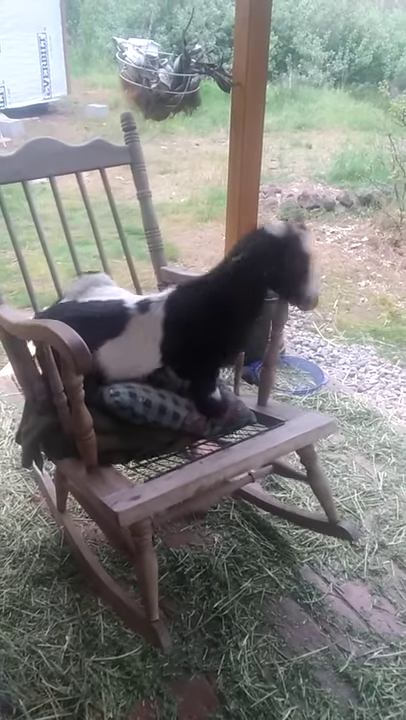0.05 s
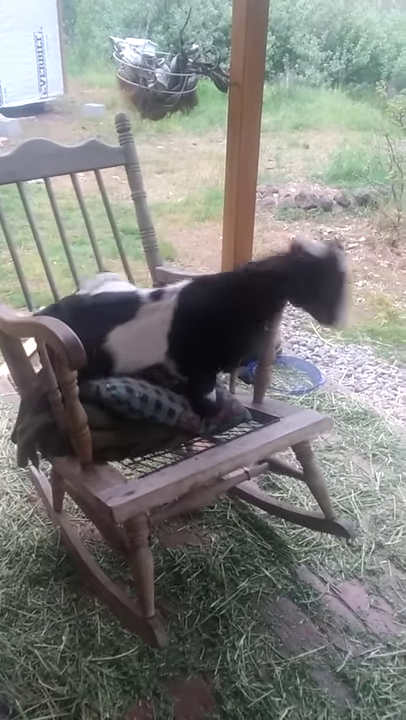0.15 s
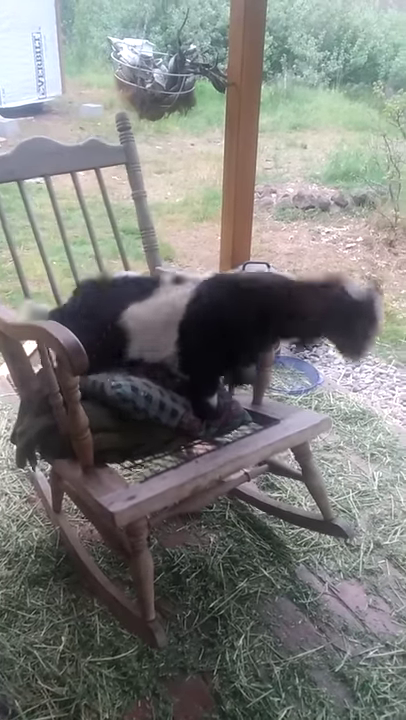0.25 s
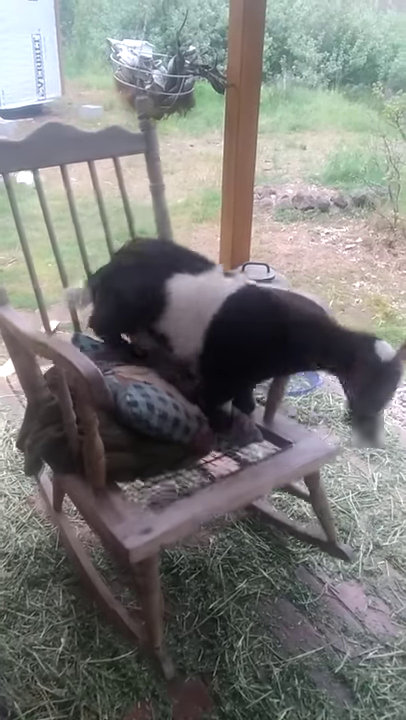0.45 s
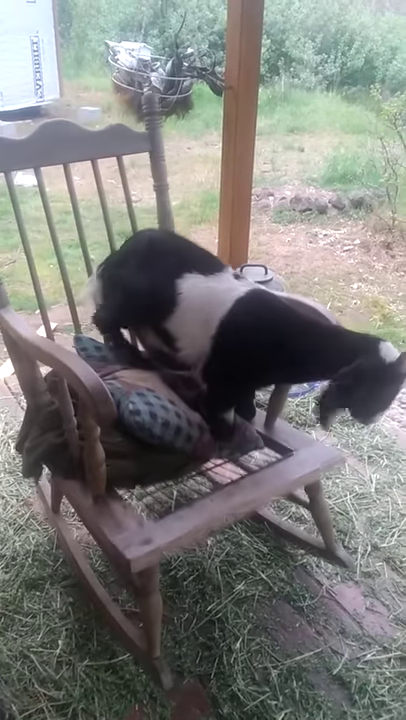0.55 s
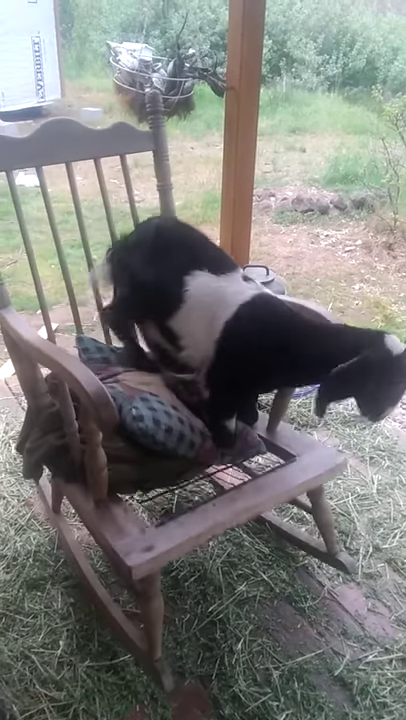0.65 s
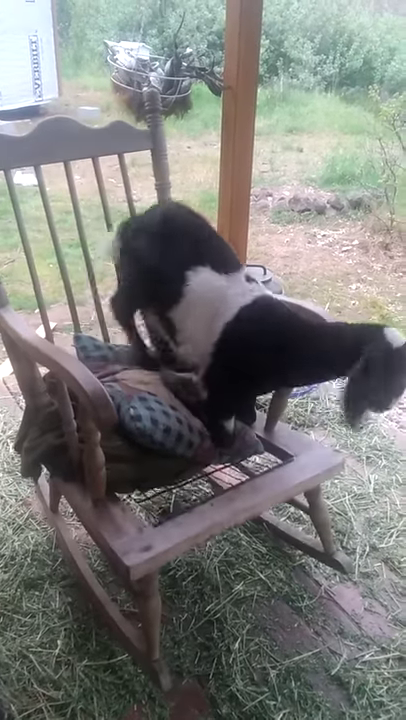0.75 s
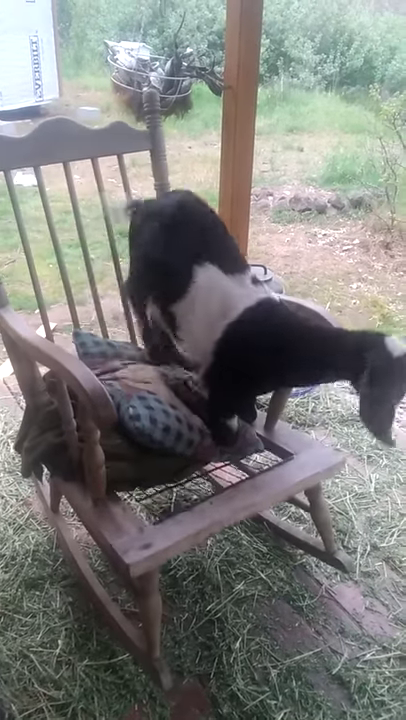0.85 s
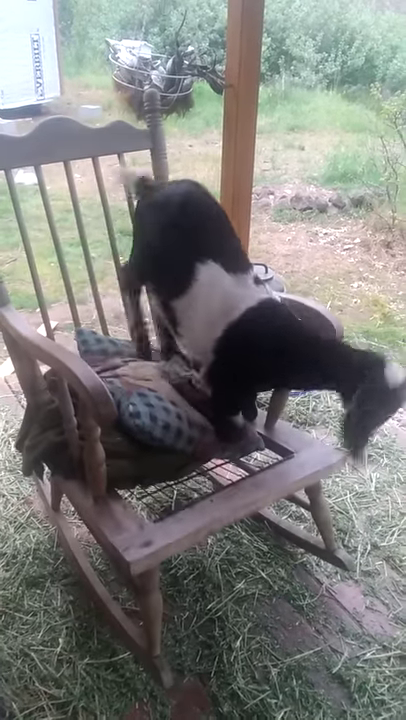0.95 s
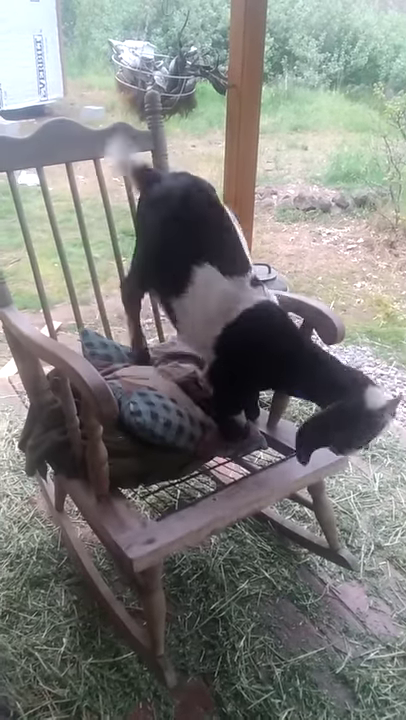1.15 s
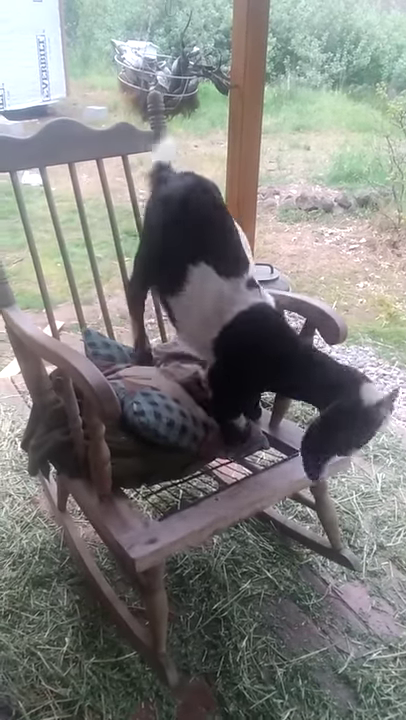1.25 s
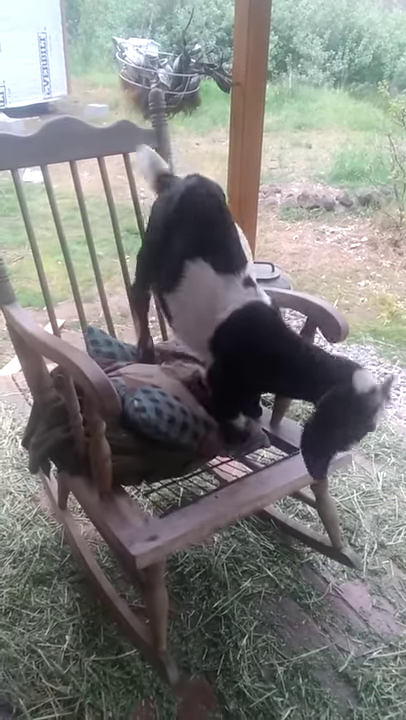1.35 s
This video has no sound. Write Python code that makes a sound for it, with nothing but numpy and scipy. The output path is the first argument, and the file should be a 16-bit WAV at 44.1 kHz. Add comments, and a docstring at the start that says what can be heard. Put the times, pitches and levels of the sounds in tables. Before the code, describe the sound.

A wooden rocking chair knocks and thuds under a young goat's hooves, its rockers rumbling low. Lighter taps follow, then a short dry creak. Crickets chirp faintly throughout, beyond the porch where the chair is heard close by.

```python
"""Crickets chirp in the grass outside a porch, first and throughout, each wing stroke a falling pip.
A young goat gets up and shifts on a wooden rocking chair: the rockers rumble over the floor,
hooves knock on the frame and thud on the seat, and a dry joint sticks and slips in a creak
as the weight moves forward."""
import sys
import numpy as np
from scipy import signal
from scipy.fft import rfft, irfft
from scipy.io import wavfile
from scipy.ndimage import uniform_filter1d

SR = 44100
rng = np.random.default_rng(int(sys.argv[2]) if len(sys.argv) > 2 else 0)


def bounce(signal):
    """Save signal as a 16-bit WAV file at the path given by the first command-line argument."""
    frames = np.transpose(np.atleast_2d(signal))
    limited = np.clip(frames, -1, 1)
    pcm = np.round(limited * 32767).astype(np.int16)
    wavfile.write(sys.argv[1], SR, pcm)


N = 61739
T = np.arange(N) / SR


def from_db(db):
    """Decibels to gain."""
    return 10 ** (np.asarray(db) / 20)


def unit_rms(x):
    """Scale to unit rms."""
    return x / np.sqrt(np.mean(x ** 2) + 1e-20)


def unit_energy(x):
    """Scale to unit energy."""
    return x / np.sqrt(np.sum(x ** 2) + 1e-20)


def envelope(rows):
    """Gain over time from rows of time_s, level_db."""
    return from_db(np.interp(T, *np.transpose(rows)))


def add(out, start_s, x):
    """Mix x into out from start_s."""
    i = int(np.clip(start_s * SR, 0, N - 1))
    out[i:i + len(x)] += x[:N - i]


def butter(x, hz, kind, order=2):
    """Butterworth filter."""
    sos = signal.butter(order, np.clip(hz, 10, .45 * SR), kind, fs=SR, output="sos")
    return signal.sosfilt(sos, x + 1e-18)


def pole_pair(hz, width_hz):
    """Coefficients of one resonance."""
    r = np.exp(-np.pi * width_hz / SR)
    return np.array([1, -2 * r * np.cos(2 * np.pi * hz / SR), r * r])


def resonate(x, hz, width_hz):
    """One resonance, unit peak gain."""
    poles = pole_pair(hz, width_hz)
    return signal.lfilter((1 - poles[2]) / 2 * np.array([1, 0, -1]), poles, x + 1e-18)


def noise(spectrum):
    """Noise from rows of freq_hz, density_db."""
    hz, db = np.transpose(spectrum)
    bins_hz = np.arange(N + 1) * SR / (2 * N)
    gain = from_db(np.interp(np.log(bins_hz + 1), np.log(hz), db))
    return irfft(rfft(rng.standard_normal(2 * N)) * gain)[:N] * np.sqrt(SR / 2)


def scatter(x, t60_s, build_s):
    """Dense reflections that build up and die away."""
    t = T[:SR]
    tail = rng.standard_normal(SR) * from_db(-60 * t / t60_s) * (1 - np.exp(-t / build_s))
    return signal.fftconvolve(x, unit_energy(tail))[:N]


STROKE_S = 0.015
GARDEN_T60_S, GARDEN_BUILD_S = 0.18, 0.0296


def wing_stroke(pitch_hz, sag_hz_per_s):
    """A pure pip that swells, fades and falls in pitch."""
    t = np.arange(-STROKE_S / 2, STROKE_S / 2, 1 / SR)
    cycles = pitch_hz * t - sag_hz_per_s * t * t / 2
    return np.cos(np.pi * t / STROKE_S) ** 2 * np.sin(2 * np.pi * cycles)


# first_stroke_s, strokes, level_db, pitch_hz, swell_db_per_stroke
CHIRPS = [(0.017, 3, -46, 5248, 2), (0.004, 3, -50.5, 5285, -0.5), (0.320, 3, -46, 5260, 0),
          (0.369, 1, -43, 5280, 0), (0.425, 3, -55, 4770, -1.5), (0.442, 2, -51, 5290, -7),
          (0.537, 1, -49, 5190, 11), (0.571, 3, -43.5, 5244, 0.4), (0.730, 3, -54.5, 4890, 1),
          (0.750, 3, -58, 4710, 1.5), (0.779, 1, -51, 5100, 0), (0.834, 3, -47, 5284, 0.5),
          (0.989, 2, -54.5, 5186, 1), (1.032, 2, -59.5, 4740, 3), (1.116, 3, -49.5, 5128, 1),
          (1.298, 3, -53.5, 5210, 5), (1.347, 2, -54, 4840, -8), (1.368, 1, -45, 5224, -11)]


def near_crickets(spacing_s=.039):
    """Chirps of one to three evenly spaced wing strokes."""
    out = np.zeros(N)
    for first_s, strokes, level_db, pitch_hz, swell_db in CHIRPS:
        pip = wing_stroke(pitch_hz, sag_hz_per_s=25000)
        for k in range(round(strokes)):
            add(out, first_s + k * spacing_s - STROKE_S / 2, from_db(level_db + k * swell_db) * pip)
    return out


# time_s, relative_db
CHORUS_ENVELOPE = [(0, -49), (0.09, -50.5), (0.14, -60), (0.21, -66.5), (0.29, -53), (0.4, -58.5),
                   (0.52, -57.5), (0.56, -61.5), (0.63, -52.5), (0.72, -63.5), (0.84, -55), (0.92, -56.5),
                   (0.97, -67), (1.09, -68.5), (1.125, -55.5), (1.2, -53.5), (1.26, -66.5), (1.4, -55.5)]
# start_s, length_s, relative_db, pitch_hz
TRILLS = [(0.19, .11, -60, 5840), (0.46, .13, -68.5, 5780), (0.83, .11, -72, 5840),
          (1.11, .11, -65.5, 5850), (0.151, .03, -66, 4560), (1.08, .13, -72, 4560)]


def far_crickets(chorus_hz=5302, spread_hz=96, sag_hz_per_s=24000):
    """Overlapping strokes blur into a shimmer; faint trills stand above and below it in pitch."""
    chorus_strokes_per_s, trill_strokes_per_s = 320, 45
    chorus, trills = np.zeros(N), np.zeros(N)
    for k, (late, detune) in enumerate(rng.standard_normal((SR // 50, 2))):
        start_s = (k + late / 2) / chorus_strokes_per_s
        if start_s < T[-1]:
            add(chorus, start_s, wing_stroke(chorus_hz + spread_hz * detune, sag_hz_per_s))
    for start_s, length_s, relative_db, pitch_hz in TRILLS:
        pip = from_db(relative_db) * wing_stroke(pitch_hz, sag_hz_per_s)
        for centre_s in np.arange(start_s, start_s + length_s, 1 / trill_strokes_per_s):
            add(trills, centre_s - STROKE_S / 2, pip)
    shimmer = from_db(-4.5) * envelope(CHORUS_ENVELOPE) * unit_rms(chorus)
    reflections = scatter(trills, GARDEN_T60_S, GARDEN_BUILD_S)
    return shimmer + from_db(0.5) * trills + from_db(-3) * reflections


# freq_hz, density_db
AIR_SPECTRUM = [(30, -112), (60, -102), (150, -105), (400, -108), (1000, -113), (3000, -121), (8000, -124),
                (15000, -124)]


def air():
    """Faint, steady hiss of air."""
    return noise(AIR_SPECTRUM)


# time_s, relative_db
RUMBLE_ENVELOPE = [(0, -90), (0.125, -92), (0.16, -61), (0.2, -53.5), (0.235, -48.5), (0.27, -39.5),
                   (0.34, -44.5), (0.385, -35), (0.45, -45.5), (0.52, -52), (0.62, -50), (0.74, -58.5),
                   (0.87, -60), (1.0, -62.5), (1.2, -64), (1.235, -57), (1.32, -41), (1.4, -55)]
# freq_hz, relative_db
RUMBLE_SPECTRUM = [(25, -31), (40, -10), (60, 4), (85, -3.5), (115, -6), (155, -5.5), (200, -20),
                   (300, -35), (600, -52.5), (2500, -100)]


def rockers():
    """Runners roll over the rough floor: an even rumble that swells and ebbs."""
    rumble = noise(RUMBLE_SPECTRUM)
    running_rms = np.sqrt(uniform_filter1d(rumble ** 2, size=2200) + 1e-20)
    return from_db(-2.5) * envelope(RUMBLE_ENVELOPE) * rumble / running_rms


# start_s, relative_db, low_hz, high_hz, grind_s
KNOCKS = [(0.149, -67, 2180, 4580, 0.0089), (0.179, -43.5, 1144, 3090, 0.042),
          (0.184, -42.5, 1304, 1393, 0.0034), (0.188, -61, 648, 724, 0.0085),
          (0.2438, -29, 150, 1000, 0.0029), (0.2495, -24, 310, 1160, 0.00036),
          (0.2508, -23.5, 1040, 2750, 0.0056), (0.258, -56, 255.6, 2210, 0.0077),
          (0.266, -22.5, 1490, 4470, 0.0034), (0.268, -20, 500, 2200, 0.0026),
          (0.272, -21.5, 2576, 3104, 0.002), (0.296, -31, 190, 1047, 0.01),
          (0.3641, -38, 1720, 3600, 0.011), (0.375, -33, 970, 1574, 0.0041), (0.378, -37, 574, 727, 0.0018),
          (0.383, -35, 200, 960, 0.0084), (0.396, -41, 1656, 2860, 0.0088), (0.453, -37, 1140, 2970, 0.01),
          (0.455, -44, 176.8, 930, 0.0047), (0.547, -55, 1300, 3100, 0.0021),
          (0.583, -60, 2440, 2640, 0.011), (0.620, -64, 2470, 2730, 0.0042),
          (0.646, -49, 1734, 2760, 0.0091), (0.649, -50, 3340, 4320, 0.006),
          (0.651, -46.5, 2305, 2745, 0.005), (0.794, -64.5, 301, 369, .003),
          (0.929, -69, 2710, 2940, 0.0025), (1.027, -51, 489, 590, 0.0029), (1.038, -62, 260, 330, .004),
          (1.046, -77, 3150, 3350, .004), (1.089, -64.5, 1456, 1753, .012),
          (1.183, -65.5, 1300, 1450, 0.0019), (1.270, -41.5, 233, 560, 0.0047),
          (1.275, -37, 543, 619, 0.0027), (1.297, -40, 260, 583, 0.018), (1.327, -47, 232, 560, 0.019),
          (1.364, -48.5, 260, 348, 0.0049)]
# freq_hz, width_hz, lift_db
FRAME_PEAKS_AND_DIPS = [(310, 84, 4.5), (424, 26, 0), (693, 43, 7), (760, 33.6, 3), (846, 53, 6),
                        (1027, 70, -9), (1128, 52, 2), (1201, 57, 6), (1303, 17, 2), (1564, 55, 7.5),
                        (1738, 12, 2.5), (1835, 45, 7), (2090, 42, 4), (2120, 40, 3), (2445, 35, 7),
                        (2686, 47, 2), (2890, 93, 4.5), (3300, 390, -4), (3605, 95, 4), (3600, 33, 4),
                        (4150, 220, -5), (4480, 40, 5)]


def hoof_knocks(grains_per_s=4000, grind_db=5, top_hz=4650):
    """Each contact is a click and a brief grind, coloured by where it lands and rung by the frame."""
    out, t = np.zeros(N), T[:SR // 8]
    for start_s, relative_db, low_hz, high_hz, grind_s in KNOCKS:
        swell = np.sqrt(t / grind_s) * np.exp(-t / grind_s)
        grains = rng.standard_normal(len(t)) * (rng.random(len(t)) < grains_per_s / SR)
        force = signal.unit_impulse(len(t)) + from_db(grind_db) * grains * swell
        knock = butter(force, [low_hz, high_hz], "band", order=3)
        add(out, start_s, from_db(relative_db + 19) * unit_energy(knock))
    for freq_hz, width_hz, lift_db in FRAME_PEAKS_AND_DIPS:
        zeros = pole_pair(freq_hz, width_hz * from_db(max(lift_db, 0)))
        poles = pole_pair(freq_hz, width_hz * from_db(max(-lift_db, 0)))
        out = signal.lfilter(zeros, poles, out)
    return butter(out, top_hz, "low", order=10)


# start_s, push_db
THUDS = [(0.2456, -32), (0.2585, -28), (0.276, -27.5), (0.3646, -25), (0.401, -33), (0.416, -34),
         (0.455, -59), (0.603, -43), (0.649, -46), (1.225, -43), (1.275, -33), (1.295, -37), (1.312, -32.5)]
# freq_hz, gain_db, t60_s
SEAT_MODES = [(57.76, -17, .2), (93, -11.5, 0.04), (121, -4.5, 0.078), (155.23, -9.5, .42),
              (187, -8, 0.041), (251, -7.5, .1)]


def seat_thuds(push_s=.005):
    """Weight lands through the cushion; soft pushes ring the low modes of seat and floor."""
    force, out = np.zeros(N), np.zeros(N)
    pulse = np.sin(np.pi * np.minimum(T[:SR // 20] / push_s, 1)) ** 2
    for start_s, push_db in THUDS:
        add(force, start_s, from_db(push_db) * pulse / pulse.sum())
    for freq_hz, gain_db, t60_s in SEAT_MODES:
        poles = pole_pair(freq_hz, width_hz=np.log(1000) / (np.pi * t60_s))
        out += from_db(gain_db) * signal.lfilter([np.sin(2 * np.pi * freq_hz / SR)], poles, force)
    return out


# time_s, relative_db
JOINT_FORCE = [(1.198, -68), (1.208, -55), (1.225, -49), (1.245, -51.5), (1.26, -52), (1.275, -45),
               (1.30, -43), (1.322, -49.5), (1.345, -59.5), (1.385, -66.5), (1.396, -45)]
# freq_hz, stage_width_hz, relative_db
JOINT_MODES = [(440, 85, -12), (597.7, 36, 3), (638, 68, 1), (1104, 43, -13.5), (1400, 176, -2),
               (1628, 180, 3.5), (1862, 67, 3.5), (2035, 69, 2), (2570, 70, 0), (2790, 210, -6),
               (3000, 110, -21), (3190, 160, -16), (3626, 220, -12.5), (4240, 67, -14.5)]


def joint_creak(slips_per_s=380, jitter=.4, spread_db=3.5):
    """A dry joint sticks and slips unevenly, harder as force grows; each slip rings its modes."""
    gap_draws, size_draws = rng.standard_normal((SR // 100, 2)).T
    slip_s = JOINT_FORCE[0][0] + np.cumsum(np.exp(jitter * gap_draws)) / slips_per_s
    slips, inside = np.zeros(N), slip_s < T[-1]
    slips[(slip_s[inside] * SR).astype(int)] = from_db(spread_db * size_draws[inside])
    click = signal.unit_impulse(SR // 8)
    # two stages per mode for steep sides
    ring = sum(from_db(db) * resonate(resonate(click, hz, width_hz), hz, width_hz)
               for hz, width_hz, db in JOINT_MODES)
    creak = signal.fftconvolve(slips * envelope(JOINT_FORCE), unit_energy(ring))[:N]
    return from_db(-4) * np.sqrt(SR / slips_per_s) * creak


def scene():
    """The chair with close reflections and a duller porch-roof tail; crickets and air outside."""
    porch_build_s, tail_top_hz = 0.0073, 3300
    wood = hoof_knocks() + joint_creak()
    tail = butter(scatter(wood, t60_s=0.39, build_s=porch_build_s), tail_top_hz, "low")
    close = scatter(wood, t60_s=0.12, build_s=porch_build_s)
    chair = wood + from_db(-5) * close + from_db(-12) * tail
    chirps = near_crickets()
    garden = chirps + from_db(-8.5) * scatter(chirps, GARDEN_T60_S, GARDEN_BUILD_S) + far_crickets()
    return (chair + seat_thuds() + rockers() + garden + air())[None]


def record(dry):
    """The small microphone loses the deepest bass; the top is cut steeply."""
    low_hz, top_hz = 45.4, 15700
    top_cut = signal.ellip(10, .1, 70, top_hz, fs=SR, output="sos")
    return signal.sosfilt(top_cut, butter(dry, low_hz, "high"))


dry = scene()
out = record(dry)
bounce(out)
```